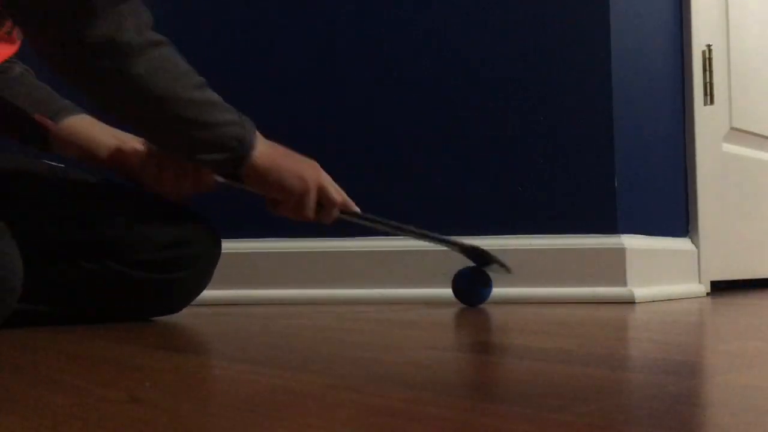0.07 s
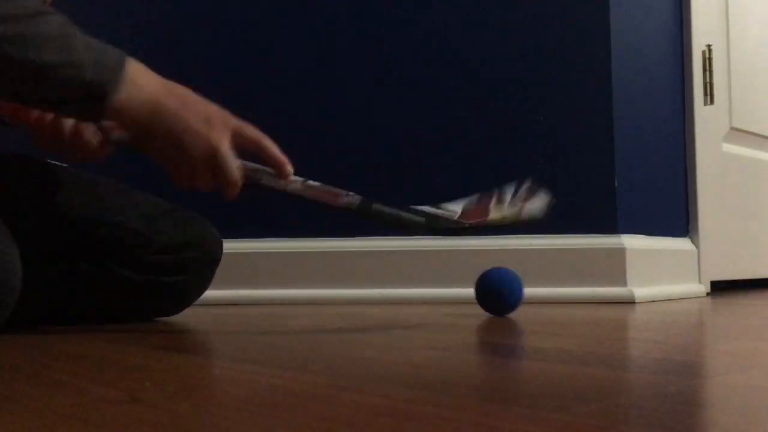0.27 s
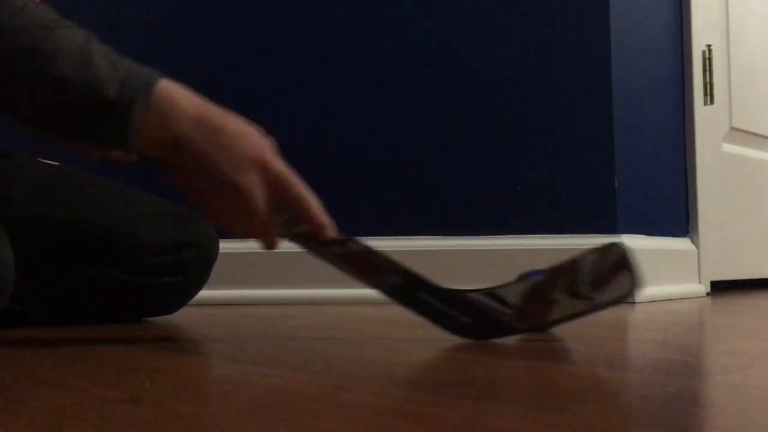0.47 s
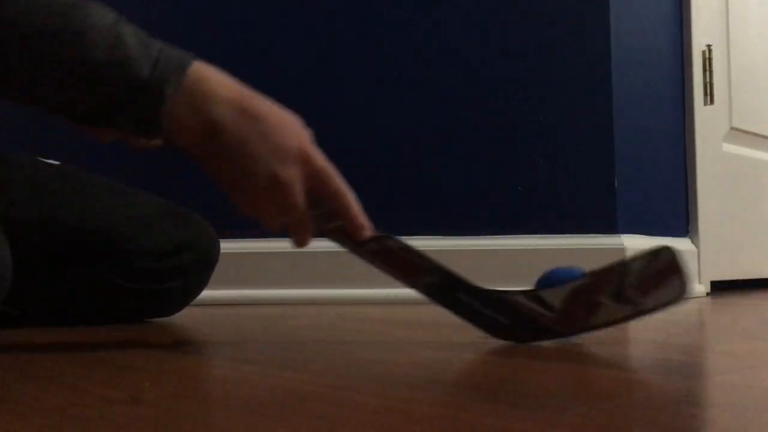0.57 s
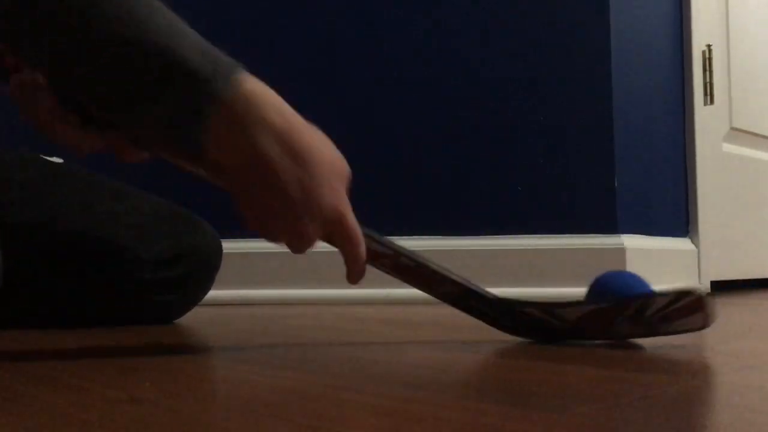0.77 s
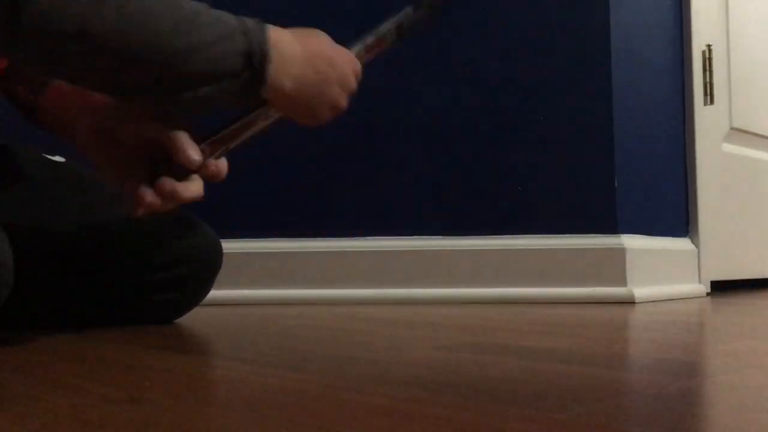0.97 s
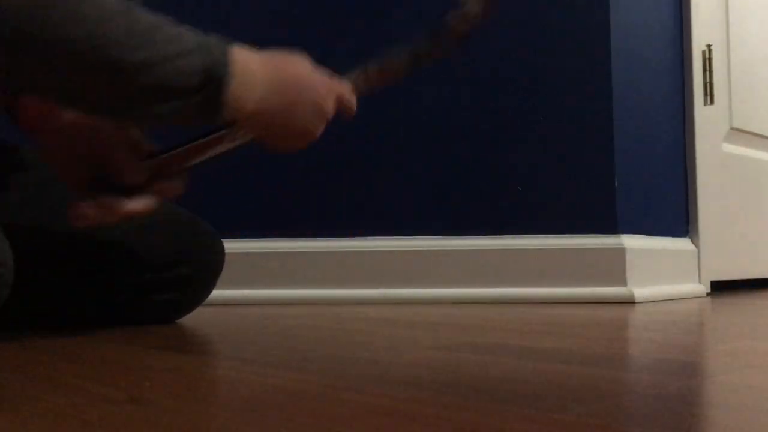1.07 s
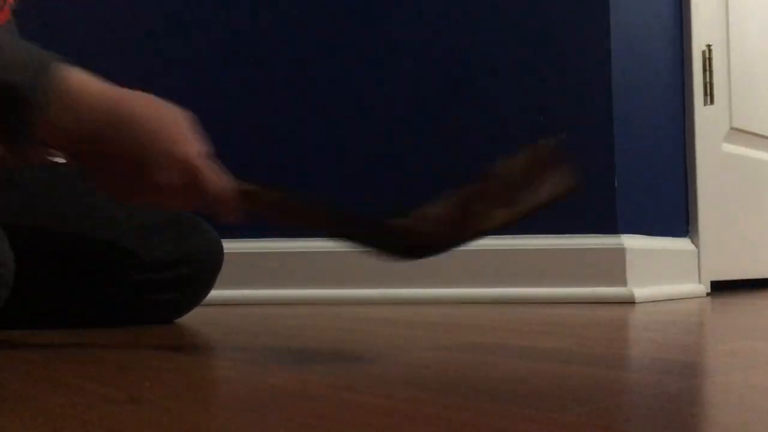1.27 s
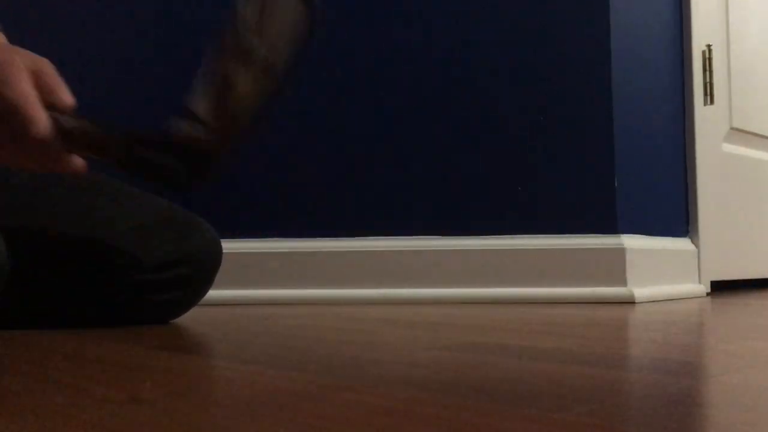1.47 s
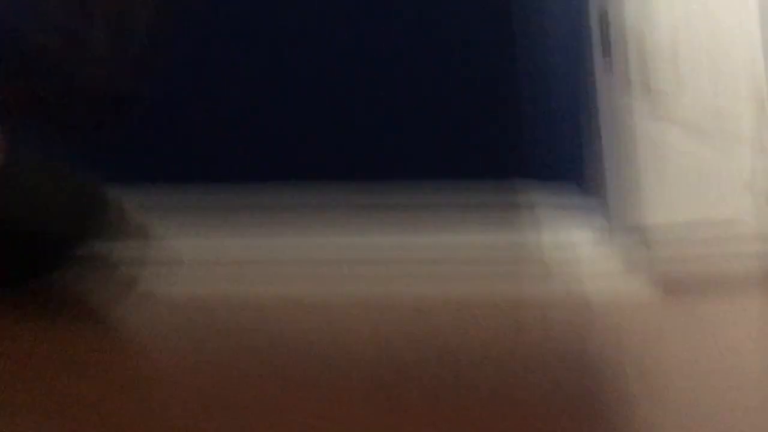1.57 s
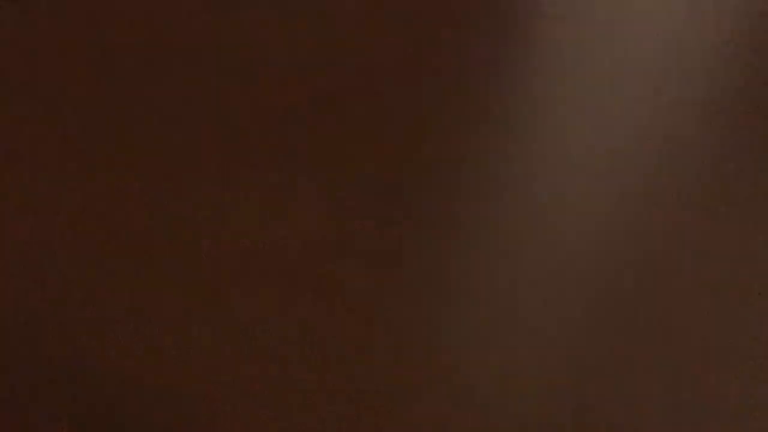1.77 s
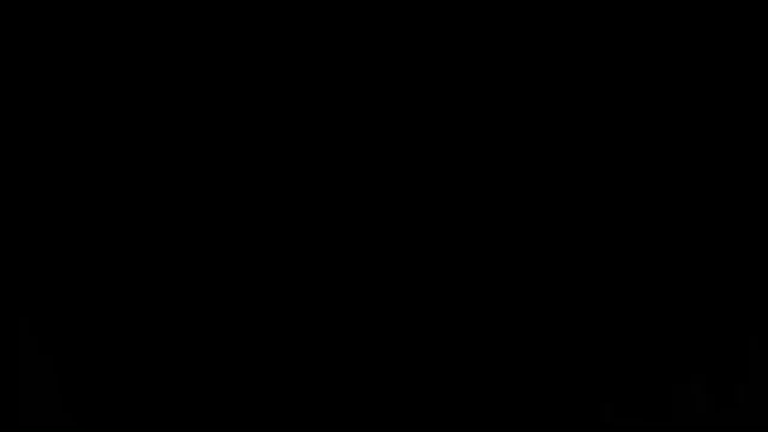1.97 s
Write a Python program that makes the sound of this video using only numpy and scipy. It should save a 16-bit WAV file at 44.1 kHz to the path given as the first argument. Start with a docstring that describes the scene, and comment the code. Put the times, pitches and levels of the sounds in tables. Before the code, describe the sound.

A small hockey stick slaps a hardwood floor, sweeps a ball away, then the camera topples over

```python
"""Knee hockey on a hardwood floor

Heard in a small room from a camera standing on the boards. A small stick clatters on a foam ball, slaps
the floor, nudges the ball and sweeps it away; the ball thuds on a wall, flies back into the camera, and the
camera topples onto the floor. Impacts are shaped clicks, noise bursts and decaying modes; friction is
coloured noise under level curves; diffuse echoes supply the room."""
import sys
import numpy as np
from scipy import signal
from scipy.fft import rfft, irfft
from scipy.io import wavfile

SR = 44100
rng = np.random.default_rng(int(sys.argv[2]) if len(sys.argv) > 2 else 0)


def file_out(sig):
    """Save sig as 16-bit WAV at sys.argv[1]."""
    # one column per channel
    cols = np.atleast_2d(sig).T
    # limit, then scale
    lim = np.clip(cols, -1, 1)
    pcm = np.round(lim * 32767).astype(np.int16)
    wavfile.write(sys.argv[1], SR, pcm)


N = 88729
SIZE = 32768  # samples in a response
BLOW_S = .01  # reference duration for impact levels
AGE_S, TIME_S = np.arange(SIZE) / SR, np.arange(N) / SR
BIN_HZ = np.fft.rfftfreq(SIZE, 1 / SR)


def amp(db):
    """Decibels to gain."""
    return 10 ** (np.asarray(db) / 20)


def blow(x, db=0):
    """Scale a short sound so that its energy, spread over BLOW_S, has this level."""
    return x * amp(db) * np.sqrt(BLOW_S * SR / np.sum(x ** 2))


def steady(x, db=0):
    """Scale a lasting sound to an rms level."""
    return x * amp(db) / np.std(x)


def along(points, hz):
    """Interpolate (f/Hz, value) points on a log-frequency axis."""
    f, v = np.array(points).T
    return np.interp(np.log(np.maximum(hz, 1)), np.log(f), v)


def colour(points):
    """Minimum-phase click with the given (f/Hz, level/dB) spectrum, by folding the cepstrum."""
    cepstrum = irfft(np.log(amp(along(points, BIN_HZ))))
    cepstrum[1:SIZE // 2] *= 2
    cepstrum[SIZE // 2 + 1:] = 0
    return irfft(np.exp(rfft(cepstrum)))


def through(x, response):
    """Convolve with a response scaled to unit energy."""
    return signal.fftconvolve(x, response / np.linalg.norm(response))[:len(x)]


def dull(x, hz):
    """Low-pass: a soft contact removes the treble."""
    return signal.sosfilt(signal.butter(2, min(hz, SR / 2 - 1), fs=SR, output="sos"), x)


def thin(x, hz, order=2):
    """High-pass: remove the bass."""
    return signal.sosfilt(signal.butter(order, hz, "high", fs=SR, output="sos"), x)


def fade(t60_s):
    """Exponential decay by 60 dB in t60_s."""
    return np.exp(-np.log(1000) * AGE_S / t60_s)


def ring(modes):
    """Sum of decaying sines from (f/Hz, level/dB, t60/s) modes."""
    return sum(amp(db) * fade(t60_s) * np.sin(2 * np.pi * hz * AGE_S) for hz, db, t60_s in modes)


def burst(t60_s):
    """White noise dying away."""
    return rng.standard_normal(SIZE) * fade(t60_s)


def grit(spread_db):
    """Dense friction clicks of uneven size."""
    size = np.minimum(rng.exponential(size=N), 3)
    return rng.standard_normal(N) * amp(spread_db * size)


def gain(curve):
    """Gain along (t/s, level/dB) points; silent outside them."""
    s, db = np.array(curve).T
    return amp(np.interp(TIME_S, s, db)) * (TIME_S > s[0]) * (TIME_S < s[-1])


def add(out, s, x):
    """Mix a sound in at a time."""
    i = max(int(round(s * SR)), 0)
    out[i:i + len(x)] += x[:N - i]


def room(count=19):
    """Diffuse echoes from one place in the room: half-octave noise bands, the bass lasting longest."""
    # decay: f/Hz, t60/s
    room_t60 = [(60, .4), (200, 0.29), (560, 0.25), (1500, .27), (4000, .26), (12000, .23)]
    build_s = .0039
    noise = rfft(rng.standard_normal(SIZE))
    build = 1 - np.exp(-(AGE_S / build_s) ** 2)
    out = 0
    for hz in SR / 2 / 2 ** (np.arange(count) / 2):
        octaves = np.log2(np.maximum(BIN_HZ, 1) / hz)
        band = np.cos(np.pi / 2 * np.clip(2 * octaves, -1, 1))
        decay = fade(along(room_t60, hz))
        out = out + np.sqrt(hz) * blow(irfft(noise * band) * decay * build)
    return out


def in_room(x, wet_db):
    """A sound with its reverberation."""
    return x + amp(wet_db) * through(x, room())


def slap():
    """The blade hits the boards: treble outruns bass and scatters at the joints; wood and room ring."""
    # crack, joint scatter, room wash: f/Hz, level/dB
    crack_colour = [(30, -43.5), (100, -11), (180, 5), (450, -3.5), (1100, -9), (2100, -7.5), (2700, -19),
                    (4200, -9.5), (5600, -23.5), (8000, -37.5), (15000, -52)]
    scatter_colour = [(100, -16.5), (400, 6.5), (1100, 7.5), (2100, 0.5), (2700, -10.5), (4200, 0),
                      (5600, -12), (8000, -28.5), (15000, -39.5)]
    wash_colour = [(35, -34), (120, -2.5), (220, -1.5), (480, -6), (1100, -2), (1600, -15), (2100, -10.5),
                   (2700, -21.5), (4200, -17), (7500, -33), (15000, -52.5)]
    # boards and blade: f/Hz, level/dB, t60/s
    wood_modes = [(149, 8.5, .14), (229, -13.5, 0.21), (711, -15.5, .27), (986, -11, .22), (1128, -3, 0.16),
                  (1322, -21.5, 0.25), (2160, -24, .24), (3250, -26, 0.18), (3990, -15, .14),
                  (4350, -24, .18)]
    slap_s, crack_db, scatter_db, ring_db, wash_db = .5188, -11.5, -20.5, -13.5, -16.5
    bending_s_root_hz = .095  # a bending wave arrives this / sqrt(f/Hz) late
    settle_s, settle_fade_s, settle_hz = .048, .012, 300  # resting blade damps the modes below settle_hz
    out = np.zeros(N)
    dispersion = np.exp(-2j * np.pi * 2 * bending_s_root_hz * np.sqrt(BIN_HZ))
    crack = irfft(rfft(colour(crack_colour)) * dispersion)
    add(out, slap_s, blow(crack, crack_db))
    scatter = through(burst(t60_s=.022), colour(scatter_colour))
    add(out, slap_s + .0018, blow(scatter, scatter_db))
    settling = np.exp(-np.maximum(AGE_S - settle_s, 0) / settle_fade_s)
    wood = sum(ring([mode]) * (settling if mode[0] < settle_hz else 1) for mode in wood_modes)
    wood = thin(wood, hz=105)  # the wood ring carries little deep bass
    wash = through(colour(wash_colour), room())
    add(out, slap_s + .0025, blow(wood, ring_db) + blow(wash, wash_db))
    return out


def camera():
    """Blows reach the microphone through the case: dull knocks, crunchy clicks, deep thumps and a rattle."""
    # blows: t/s, level/dB, low-pass/Hz, click level/dB
    knock_table = [(1.6515, -7.5, 2400, -20.5), (1.6548, -10.5, 585, -34), (1.659, -10.5, 162, -60),
                   (1.686, -20.5, 494, -41), (1.7013, -33, 1280, -43.5), (1.7042, -21.5, 294, -58),
                   (1.9023, -28, 584, -28.5), (1.9137, -13.5, 498, -29), (1.9238, -15, 560, -20.5),
                   (1.9253, -19, 1170, -18), (1.95, -18.5, 490, -29.5), (1.9546, -16.5, 654, -34),
                   (1.9676, -36, 900, -34)]
    # case body, click: f/Hz, level/dB
    case_colour = [(25, -13.5), (70, -12.5), (140, 19), (230, -8), (370, -5.5), (520, 3), (720, 2.5),
                   (1020, 11), (1450, -1), (1900, -2.5), (2650, -6.5), (3500, -23.5), (15000, -29)]
    click_colour = [(200, -2.5), (1200, 16), (2200, 18.5), (3200, 13.5), (4800, 4), (7000, -5.5),
                    (11000, -13.5), (15000, -20)]
    # light plastic case: f/Hz, level/dB, t60/s
    case_modes = [(227.4, -3, 0.035), (312, 3, 0.023), (420, 2.5, 0.022), (516, 1.5, 0.018),
                  (632, 0.5, 0.035), (890, -4, .018), (1020, 2, 0.018), (1218, -7, 0.05),
                  (1760, -15, 0.017)]
    # weight rocking on the floor: t/s, level/dB, f/Hz, t60/s
    thump_table = [(1.6531, -12.5, 80, 0.098), (1.9176, -6.5, 140, 0.013), (1.9303, -5.5, 62, 0.072)]
    # loose parts: t/s, level/dB
    rattle_table = [(1.6525, -31.5), (1.6554, -33.5), (1.664, -42), (1.674, -44), (1.6864, -46),
                    (1.6904, -39.5), (1.7079, -45.5), (1.718, -53), (1.9547, -51)]
    # loose parts: f/Hz, level/dB
    rattle_colour = [(1500, -14.5), (4500, -5), (7000, 1), (12000, -2.5), (16000, -15)]
    knocks, clicks, near = np.zeros((3, N))
    case = blow(colour(case_colour)) - blow(ring(case_modes), db=-1)
    click = colour(click_colour)
    for s, db, hz, click_db in knock_table:
        add(knocks, s, blow(dull(case, hz), db))
        crunch = blow(through(burst(t60_s=.0073), click), db=3)  # crushed grit
        add(clicks, s, blow(blow(click) + crunch, click_db))
    for s, db, hz, t60_s in thump_table:
        thump = dull(ring([(hz, 0, t60_s)]), hz=258)
        add(near, s, -blow(thump, db))
    tick = colour(rattle_colour)
    for s, db in rattle_table:
        add(near, s, blow(through(burst(t60_s=.012), tick), db))
    return in_room(knocks, wet_db=-20) + in_room(clicks, wet_db=-16.5) + near


def skid():
    """The case scuffs as coloured grit, with a faint, narrow, unsteady 3.1 kHz tone swelling up to the click."""
    # scuffs: start/s, length/s, level/dB
    scuff_table = [(1.636, 0.018, -24), (1.855, 0.021, -45), (1.883, 0.064, -23), (1.943, .03, -21)]
    # scuff spectrum: f/Hz, level/dB
    scuff_colour = [(40, -36), (120, 11), (450, -1), (750, -8), (1300, -21.5), (3000, -30.5), (5000, -54),
                    (15000, -68)]
    tone_s, tone_length_s, tone_hz, tone_db = 1.904, .022, 3100, -26
    wobble = .022  # rms, fraction of tone_hz
    press = sum(amp(db) * np.sin(np.pi * np.clip((TIME_S - s) / length_s, 0, 1))
                for s, length_s, db in scuff_table)
    scuff = press * steady(through(grit(spread_db=1), colour(scuff_colour)))
    progress = (TIME_S - tone_s) / tone_length_s
    unsteady_hz = tone_hz * (1 + wobble * steady(dull(rng.standard_normal(N), hz=403)))
    swell = np.sqrt(np.clip(progress, 0, 1)) * np.clip(10 * (1 - progress), 0, 1)
    tone = np.sqrt(2) * np.sin(2 * np.pi * np.cumsum(unsteady_hz) / SR)
    return scuff + amp(tone_db) * swell * tone


def sweep():
    """Juddering friction rings the blade, brighter as it grows louder, until it lifts; a fine hiss joins."""
    # rubbing effort: t/s, level/dB
    effort_curve = [(.79, -78), (.825, -44.5), (.85, -35.5), (.872, -26), (0.885, -24), (0.898, -24),
                    (.899, -52), (.91, -94)]
    # friction: f/Hz, level/dB
    rub_colour = [(100, -21.5), (300, 8.5), (550, -2), (1050, 4), (1600, 7), (2700, 3), (4000, 5.5),
                  (5500, -7), (8000, -17.5), (15000, -35)]
    # blade: f/Hz, level/dB, t60/s
    blade_modes = [(627, 0, 0.17), (1546, 6, .12), (1873, 2, 0.15), (1991, 0.5, 0.11), (3340, 4, 0.13),
                   (4300, -5, 0.062)]
    ring_db, wet_db, judder_db, judder_hz = -8.5, -9.5, 2, 180
    dull_hz, full_bright_db = 1040, -21.5
    hiss_s, hiss_width_s, hiss_db = .85, .051, -55
    effort = gain(effort_curve)
    judder = amp(judder_db * steady(dull(rng.standard_normal(N), judder_hz)))
    grains = grit(spread_db=3) * judder
    rub = steady(through(grains, colour(rub_colour)))
    bright = np.minimum(effort / amp(full_bright_db), 1) ** .5
    scrape = effort * (bright * rub + (1 - bright) * steady(dull(rub, dull_hz)))
    blade = amp(ring_db) * through(effort * bright * steady(grains), ring(blade_modes))
    hiss_colour = colour([(1500, -5.5), (4000, 0.5), (9000, 0), (15000, -6)])
    hiss = steady(through(rng.standard_normal(N), hiss_colour), hiss_db)
    hiss_swell = np.exp(-((TIME_S - hiss_s) / hiss_width_s) ** 2 / 2)
    return in_room(scrape + blade + hiss * hiss_swell, wet_db)


def taps():
    """The blade clatters on top of the ball: soft low-passed taps and one hard clack of noise."""
    # taps: t/s, level/dB, low-pass/Hz
    tap_table = [(.0005, -22, 1810), (.0055, -19.5, 1480), (0.0112, -22, 470), (.022, -23.5, 1400),
                 (0.0367, -26, 394)]
    # tap, clack: f/Hz, level/dB
    tap_colour = [(40, -17), (110, -6), (200, -1), (330, 3), (520, -10), (1100, -8.5), (1900, -21.5),
                  (3700, -13), (5200, -31), (15000, -23)]
    clack_colour = [(500, -28), (1500, -2.5), (2400, -4), (3900, 1), (4600, -11.5), (6000, -21),
                    (15000, -33.5)]
    clack_s, clack_db = .004, -28
    soft, hard = np.zeros((2, N))
    click = colour(tap_colour)
    for s, db, hz in tap_table:
        add(soft, s, blow(dull(click, hz), db))
    clack = through(burst(t60_s=.047), colour(clack_colour))
    add(hard, clack_s, blow(clack, clack_db))
    return in_room(soft, wet_db=-2) + in_room(hard, wet_db=-1.5)


def wall():
    """The ball thuds on a far wall; its hollow panel rings, hard echoes and a wash follow."""
    # thud: f/Hz, level/dB
    thud_colour = [(40, -36), (85, 5), (150, 0), (260, 4), (420, 0), (630, 2), (1030, -7), (1300, -19),
                   (3000, -24), (5500, -37), (15000, -52.5)]
    # first echoes: t/s, level re thud_db/dB
    echo_table = [(1.0719, 2.5), (1.0755, -0.5), (1.0847, -2), (1.0881, -1.5), (1.0998, -8), (1.1091, -6.5)]
    # hollow wall: f/Hz, level/dB, t60/s
    panel_modes = [(232, -2, .2), (275, 0, .14), (366, -6, .17), (425, -8, .27), (517, -4, .2),
                   (598, -5, .2), (668, -2, .2), (786, -9, .14), (985, -12, .27), (1120, -17, .2)]
    wall_s, thud_db, wash_db, tick_db, ring_db = 1.0682, -22, -17, -35, -19.5
    out, thud = np.zeros(N), colour(thud_colour)
    tick = colour([(300, -2), (1800, 8.5), (5000, -4.5), (15000, -13)])
    add(out, wall_s, blow(tick, tick_db))
    for s, db in echo_table:
        add(out, s, blow(thud, thud_db + db))
    add(out, wall_s, blow(through(thud, room()), wash_db))
    push = dull(burst(t60_s=.016), hz=1200)
    add(out, wall_s, blow(through(push, ring(panel_modes)), ring_db))
    return out


def bumps():
    """Soft nudges of the foam ball ring ball and blade, too light to make any bass."""
    # nudges: t/s, level/dB, low-pass/Hz
    bump_table = [(0.6652, -27.5, 640), (.683, -35.5, 495), (0.7321, -30.5, 563), (0.7773, -37, 446),
                  (0.8842, -24.5, 700)]
    # ball and blade together: f/Hz, level/dB, t60/s
    bump_modes = [(158.4, -10.5, 0.21), (226, 2, 0.04), (318, 3.5, 0.036), (572, -9, 0.058)]
    out, body = np.zeros(N), thin(ring(bump_modes), hz=140, order=3)
    for s, db, hz in bump_table:
        add(out, s, blow(dull(body, hz), db))
    return in_room(out, wet_db=-8.5)


def roll():
    """The ball rubs along between blade and boards: coloured grit under a level curve."""
    # rubbing: t/s, level/dB
    roll_curve = [(.62, -46.5), (.667, -38.5), (.70, -45.5), (.745, -44), (.81, -58), (.86, -47)]
    # rubbing: f/Hz, level/dB
    roll_colour = [(60, -35), (120, -32), (160, 7), (320, 7.5), (450, -6), (900, -6), (1400, -12.5),
                   (3000, -25.5), (4400, -19), (6500, -32.5), (15000, -39.5)]
    return gain(roll_curve) * steady(through(grit(spread_db=5), colour(roll_colour)))


def boards():
    """The floor shudders on after thuds, in low decaying modes."""
    # shudders: t/s, level/dB
    shudder_table = [(0.021, -29), (1.097, -28), (1.665, -28)]
    # floor: f/Hz, level/dB, t60/s
    floor_modes = [(58, -8, 0.44), (83, -5.5, 0.67), (113, 1, 0.14), (144, -1.5, 0.52), (197, -12, 0.43)]
    out = np.zeros(N)
    for s, db in shudder_table:
        add(out, s, blow(ring(floor_modes), db))
    return out


def air():
    """Quiet room rumble and hiss: steady coloured noise."""
    # room noise: f/Hz, level/dB
    air_colour = [(15, -32.5), (25, -1.5), (157, -4.5), (190, -19), (293, -6), (373, -19.5), (439, -15.5),
                  (1700, -29.5), (2280, -31), (16000, -43.5)]
    noise = through(rng.standard_normal(N + SIZE), colour(air_colour))
    return steady(noise[SIZE:], db=-55.5)  # filter onset dropped


def scene():
    """Everything at the one microphone."""
    stick_and_ball = slap() + sweep() + taps() + wall() + bumps() + roll()
    return (stick_and_ball + camera() + skid() + boards() + air())[None]


def record(dry):
    """The microphone loses the deepest bass; the recorder rounds off overloads and cuts the top."""
    limit, top_hz = .95, 16000
    heard = thin(dry, hz=32)
    held = heard / (1 + (heard / limit) ** 8) ** (1 / 8)
    return signal.sosfilt(signal.ellip(8, .2, 70, top_hz, fs=SR, output="sos"), held)


dry = scene()
out = record(dry)
file_out(out)
```